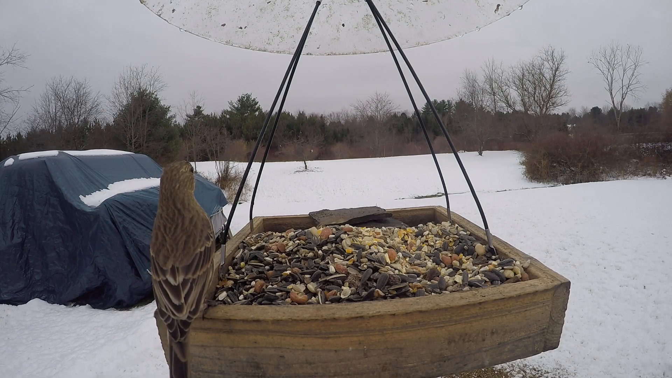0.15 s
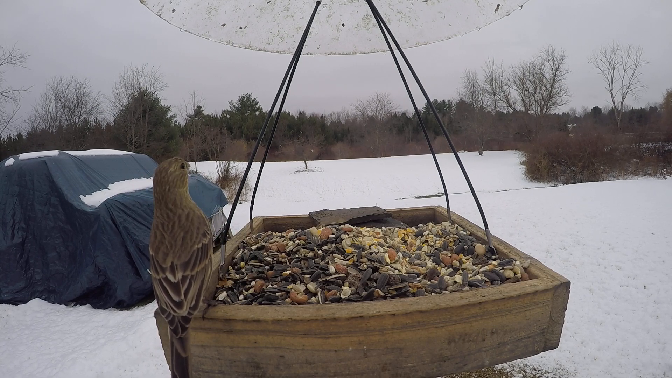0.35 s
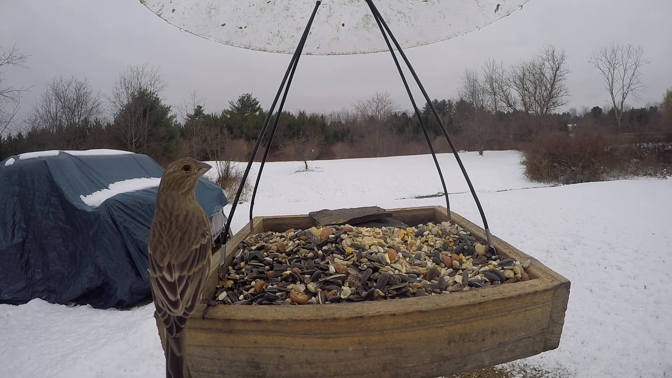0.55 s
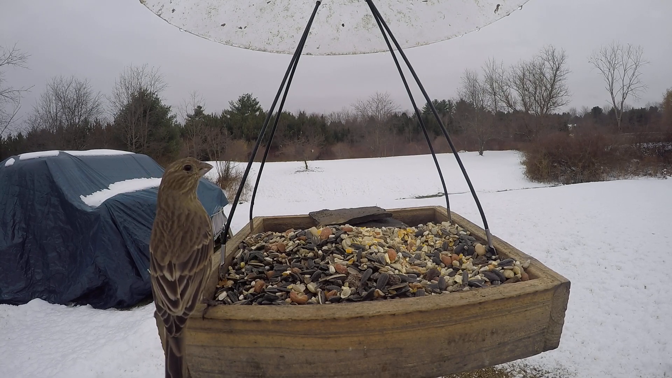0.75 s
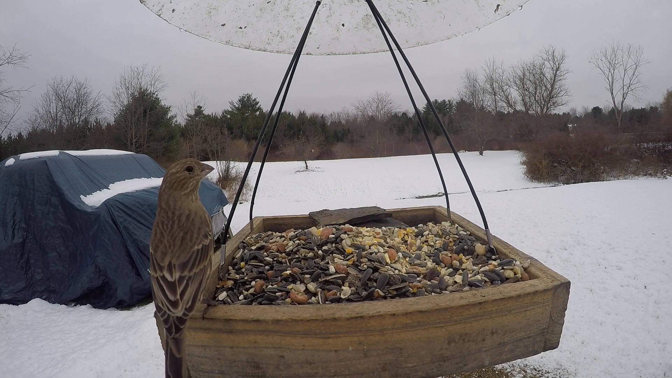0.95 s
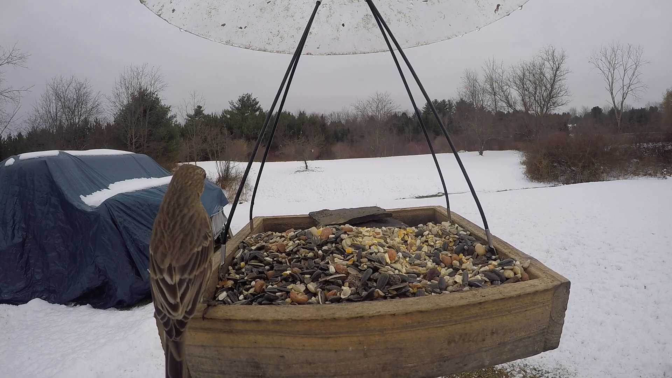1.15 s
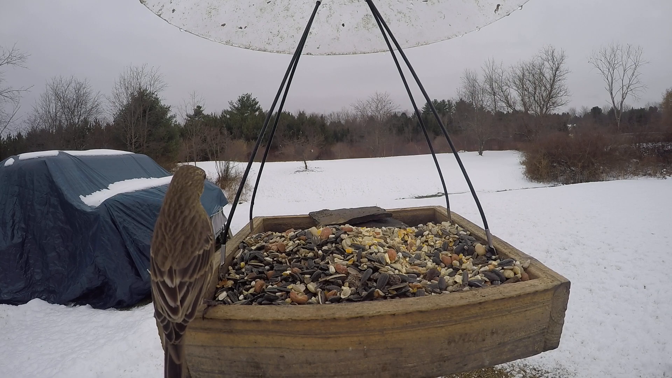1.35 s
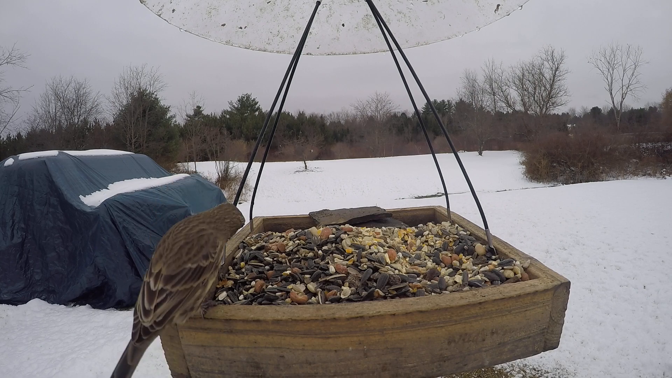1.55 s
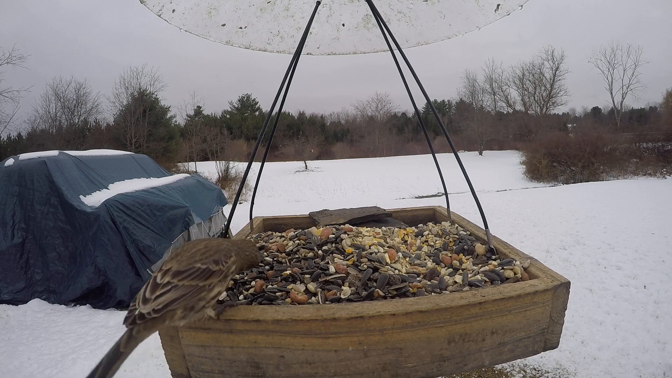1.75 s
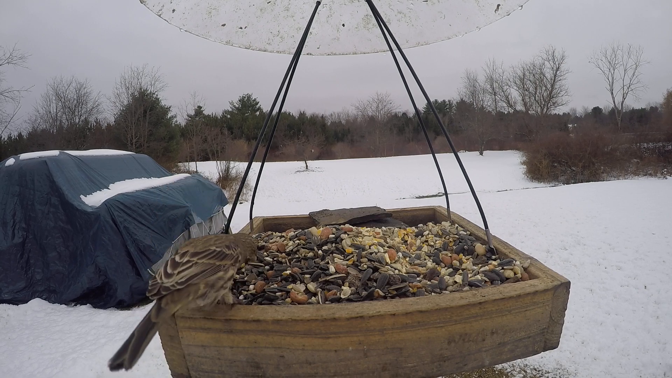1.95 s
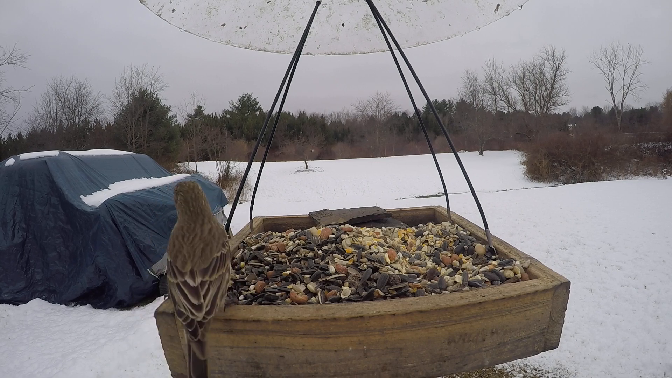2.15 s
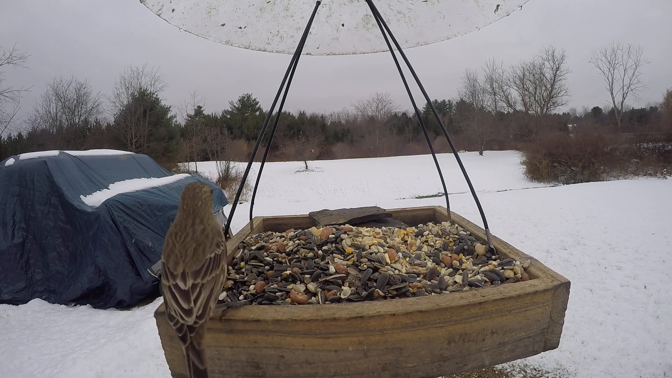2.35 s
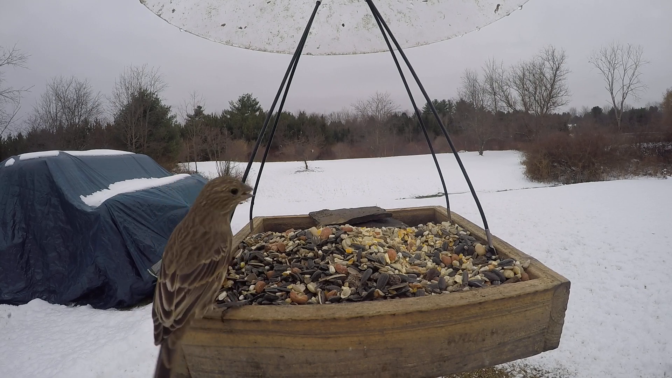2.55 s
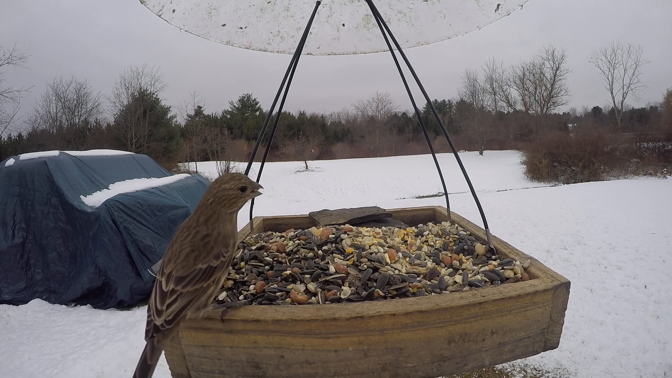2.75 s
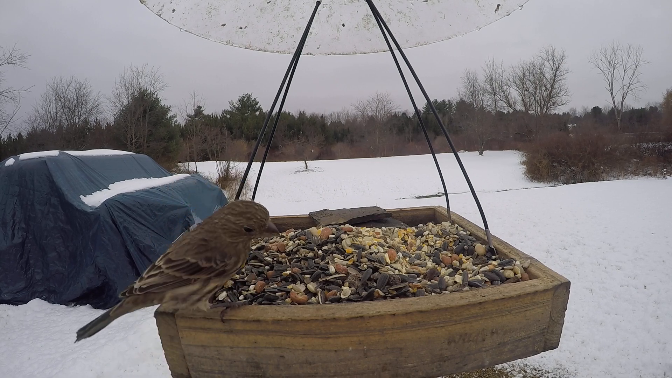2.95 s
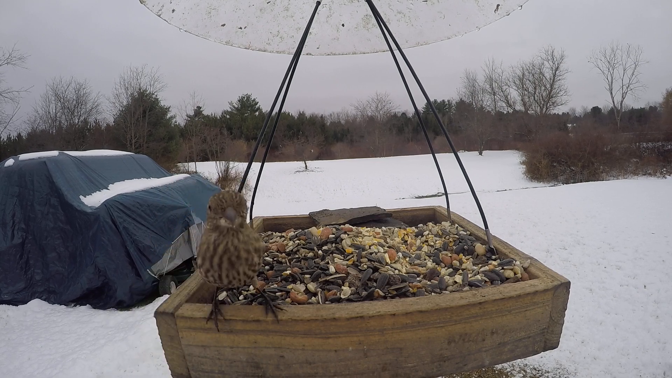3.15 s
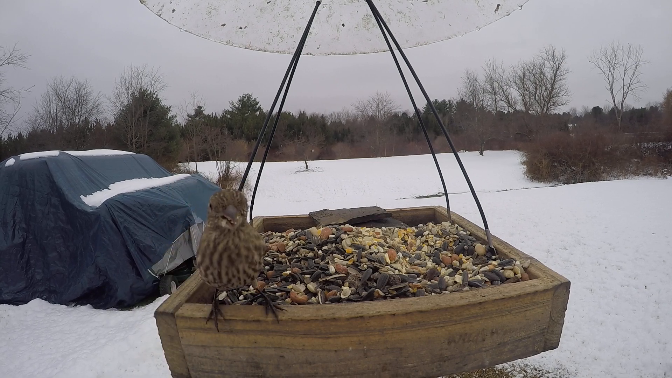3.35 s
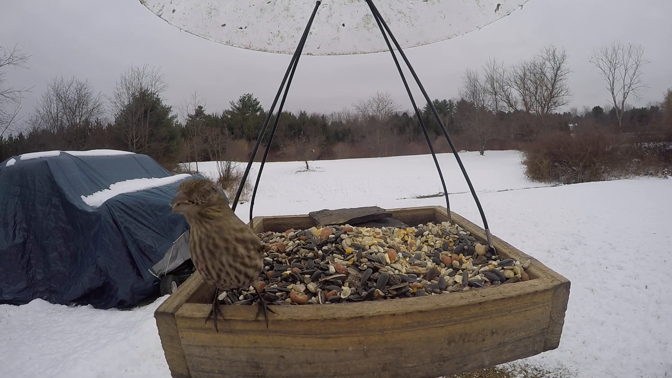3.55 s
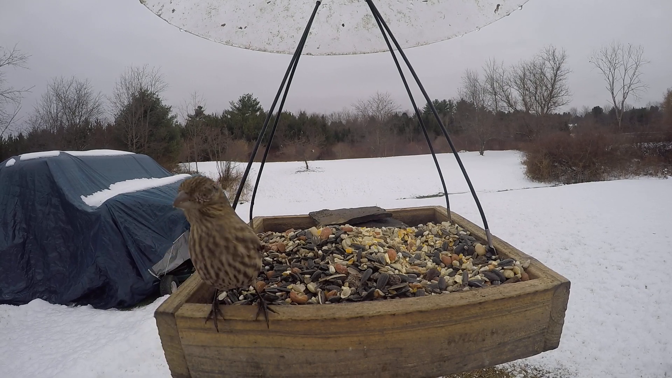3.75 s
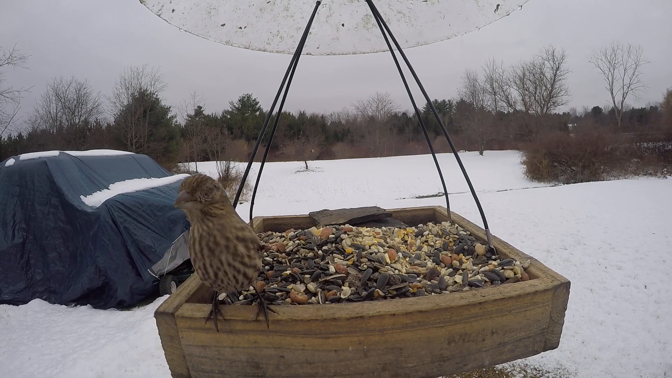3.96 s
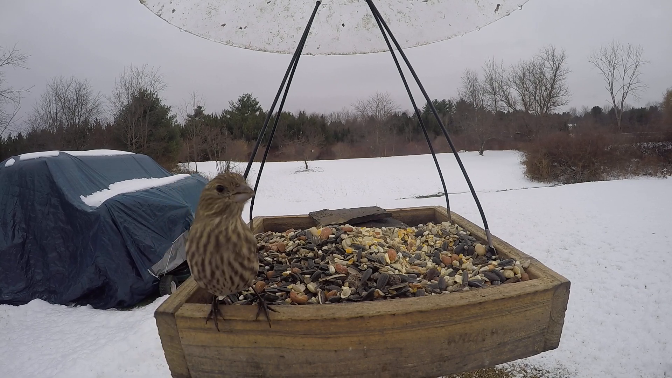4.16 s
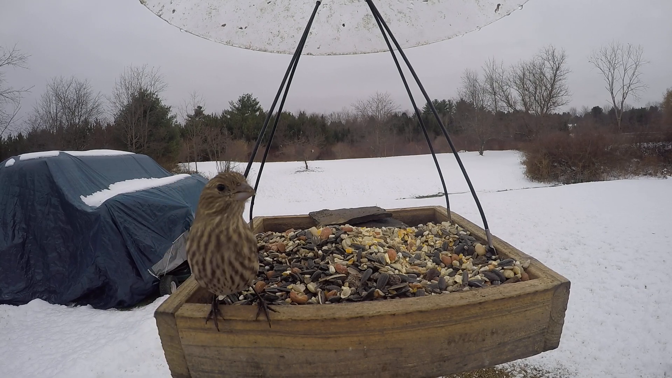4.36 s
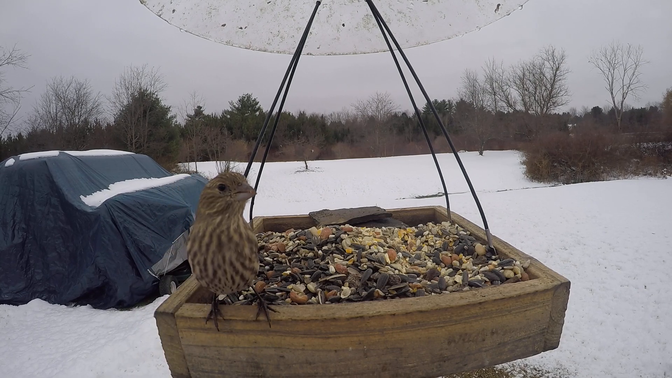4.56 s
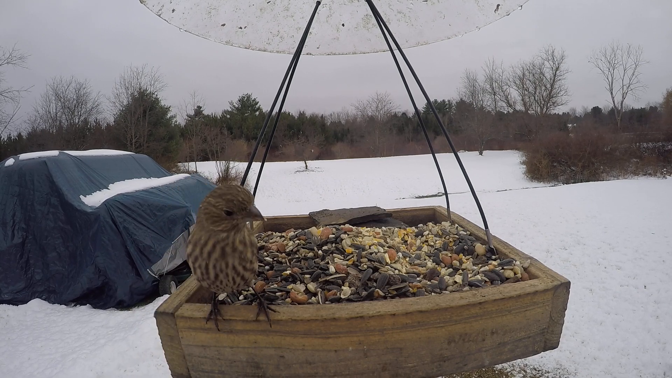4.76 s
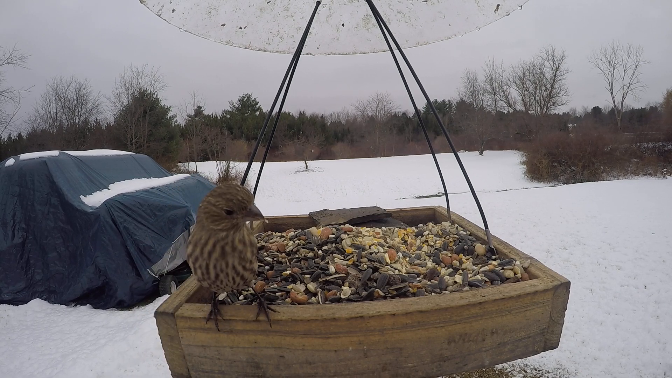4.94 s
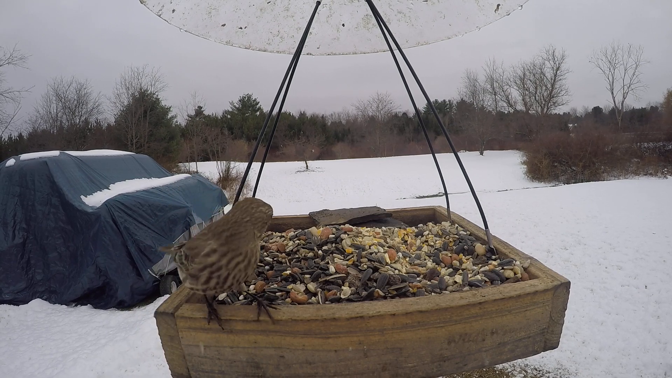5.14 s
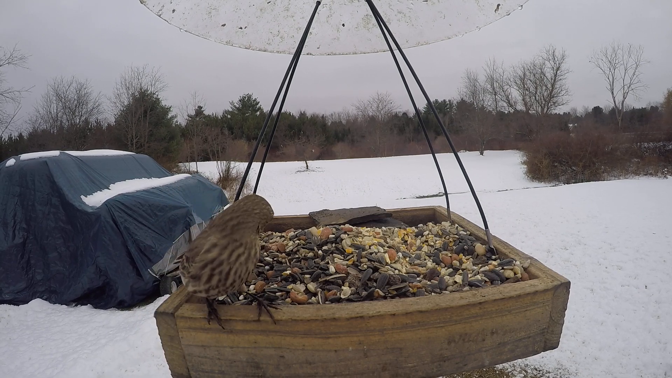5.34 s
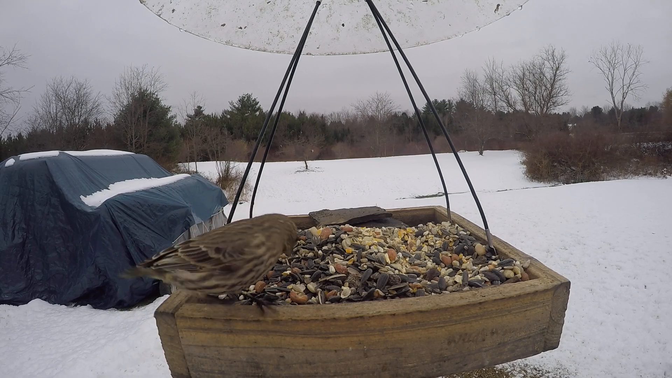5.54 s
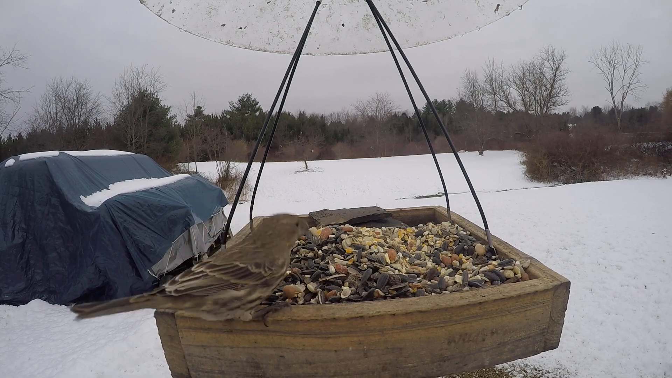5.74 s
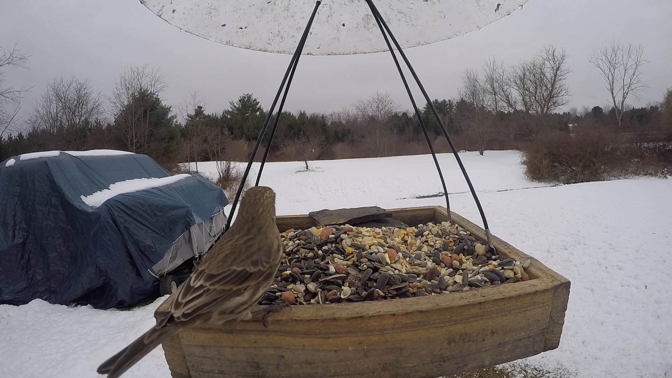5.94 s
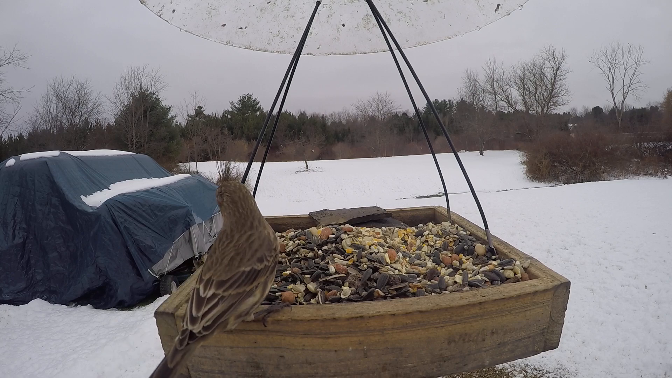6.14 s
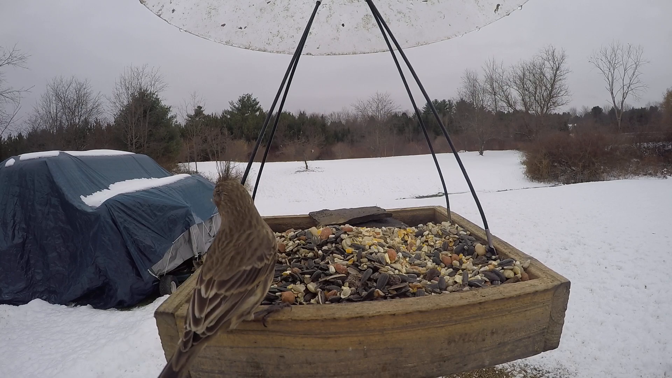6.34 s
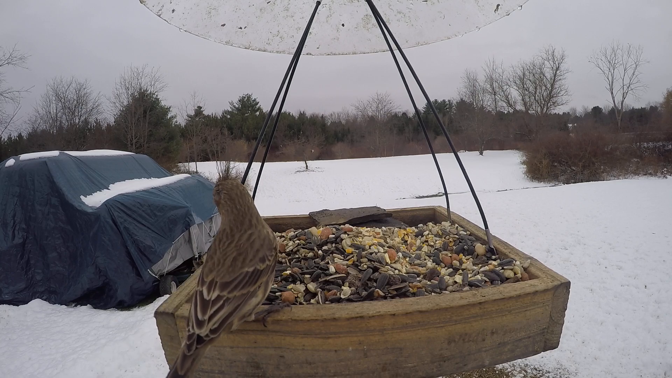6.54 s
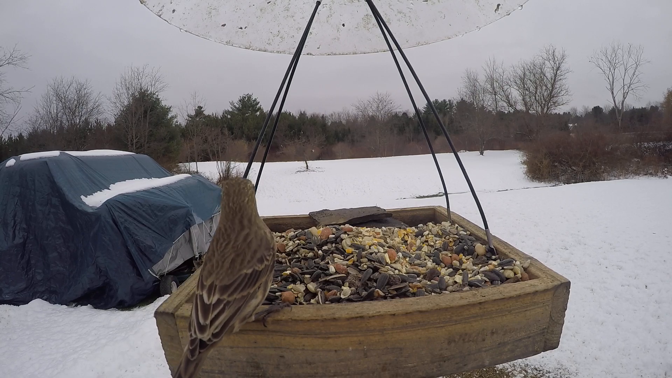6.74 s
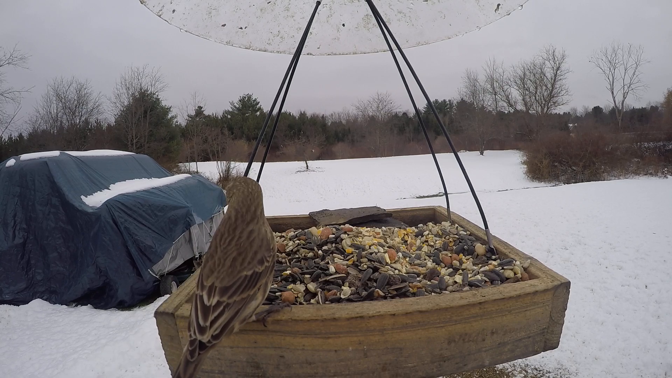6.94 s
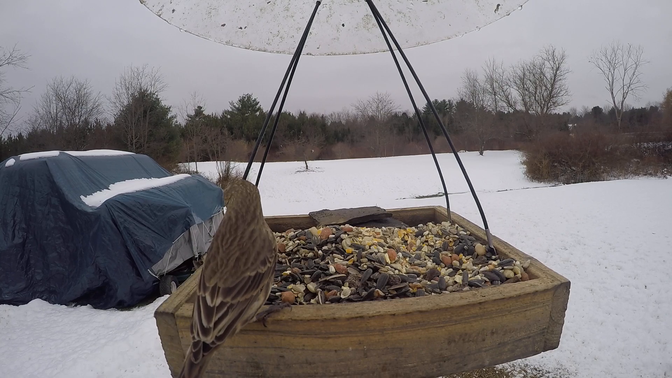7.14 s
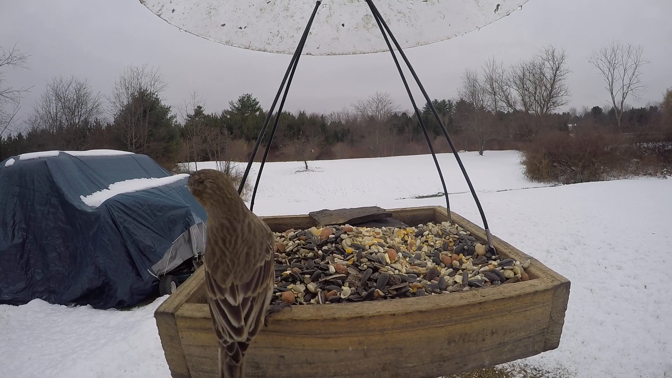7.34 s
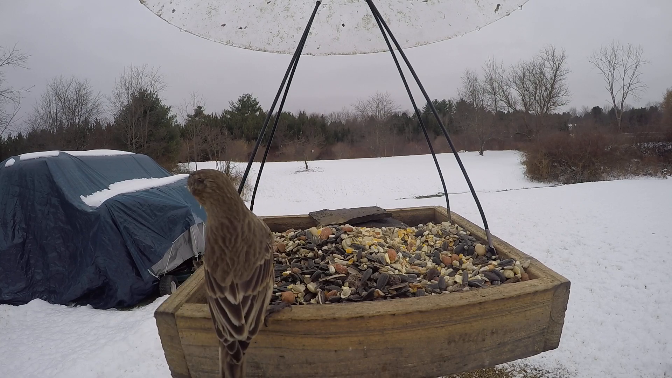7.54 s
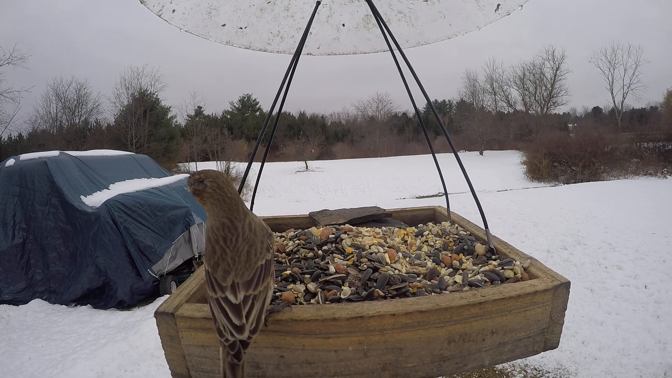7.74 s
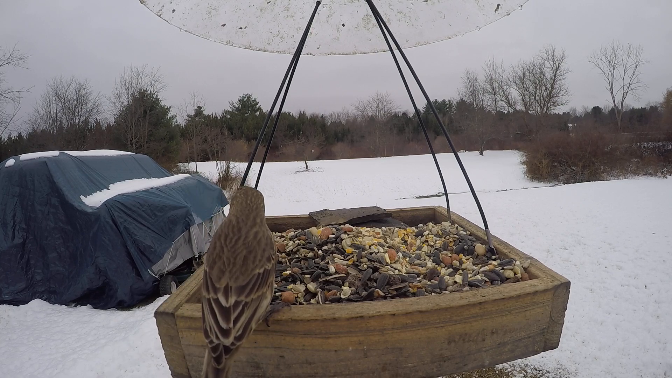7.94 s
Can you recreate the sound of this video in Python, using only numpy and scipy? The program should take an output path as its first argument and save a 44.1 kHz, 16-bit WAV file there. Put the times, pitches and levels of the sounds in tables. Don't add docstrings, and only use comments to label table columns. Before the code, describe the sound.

A small bird shuffles on a hanging wooden seed tray, heard very close through the wood. Quiet at first with faint ticks and a far thin chip, then a busy flurry of hollow knocks and claw scratches around two seconds, another around three, a sharp burst near five and a half, and a few isolated taps later. Deep wobbling rumble follows each jolt, over faint steady hiss in an open snowy field.

```python
import sys
import numpy as np
from scipy import signal
from scipy.fft import rfft, irfft, next_fast_len
from scipy.io import wavfile
from scipy.ndimage import uniform_filter1d

SR = 44100
rng = np.random.default_rng(int(sys.argv[2]) if len(sys.argv) > 2 else 0)


def dump_mix(stems):
    frames = np.atleast_2d(stems).T
    limited = np.clip(frames, -1, 1)
    pcm = np.round(limited * 32767).astype(np.int16)
    wavfile.write(sys.argv[1], SR, pcm)


def to_linear_factor(level_db):
    exponent = np.asarray(level_db, float) / 20
    return 10 ** exponent


N = 357033

# frequency in Hz, level in dB per Hz.
HISS_SPECTRUM = [(26, -26.5), (45, -6), (60, -14.5), (81, -16.5), (128, -24), (453, -34), (792, -34.5),
                 (1490, -39.5), (4900, -39.5), (6250, -44), (9300, -47), (10200, -47), (12000, -49),
                 (13200, -46.5), (15000, -51.5)]
# start in seconds, length in seconds, first pitch in Hz, last pitch in Hz, level in dB.
FAR_CHIPS = [
    (0.76, 0.1, 8500, 7400, -71),
    (0.76, .07, 9700, 9000, -84),
    (1.055, 0.074, 7700, 7500, -74),
]
# start in seconds, peak in dB.
HUSK_SNAPS = [
    (2.398, -42),
    (5.6417, -40),
    (6.4346, -44),
]
# time in seconds, swing just after in dB.
JOLTS = [(0, -45), (.37, -41), (.63, -40.5), (1.09, -37), (1.55, -40), (1.74, -46), (1.85, -38),
         (1.97, -24), (2.14, -25.5), (2.47, -36), (2.6, -45.5), (2.74, -42), (2.95, -41), (3.21, -24.5),
         (4.8, -44), (5.18, -42), (5.3, -47), (5.42, -40.5), (5.62, -42), (5.68, -26), (5.95, -30.5),
         (6.77, -69), (6.87, -40), (7.0, -35.5), (7.38, -34), (7.88, -53.5), (7.99, -40.5)]
# start in seconds, pitch in Hz, level in dB, time to fade by 60 dB in seconds.
WIRE_RINGS = [
    (3.255, 134, -53.5, 0.9),
    (5, 340, -49, 0.031),
    (1.188, 1070, -43.5, .012),
    (6.7335, 604, -37, 0.032),
    (3.2, 560, -37.5, 0.046),
    (1.8, 370, -55, .04),
    (2.3, 350, -50.5, 0.05),
]
# time in seconds, long board peak in dB, short board level in dB.
LANDINGS = [(0.348, -46.5, -68), (1.471, -54, -71), (1.555, -44.5, -69), (1.801, -33, -36),
            (1.939, -30, -40.5), (1.991, -40, -48.5), (2.164, -37.5, -36), (2.441, -41.5, -40.5),
            (2.651, -51.5, -56.5), (2.955, -45, -54), (2.996, -54, -55), (3.053, -36, -51),
            (3.13, -43, -53), (3.169, -34, -44), (3.2, -32, -39), (3.628, -47, -51.5), (4.08, -53, -67),
            (5.197, -64, -61), (5.621, -37, -55), (5.658, -41, -35), (5.763, -37.5, -45.5),
            (5.858, -44.5, -50.5), (6.74, -42, -55), (7.368, -40, -44.5), (7.854, -69, -80),
            (7.948, -56, -66)]
# pitch in Hz, level in dB, time to fade by 60 dB in seconds.
LONG_BOARD_MODES = [(47.5, -5.5, 0.27), (61, -2.5, 0.077), (78, -4.5, 0.28), (100.8, -8.5, 0.22)]
SHORT_BOARD_MODES = [(168.4, 2, 0.061), (186.7, 2, 0.12), (344, -11.5, 0.11)]
# pitch in Hz, level in dB, time to fade by 60 dB in seconds.
LOW_HOUSING = [(532, -27.5, 0.028), (585, -14, 0.028), (709, -9, 0.019), (762, -3.5, 0.018),
               (907.5, -1, 0.023), (970.5, -3.5, 0.028), (1124, -11.5, 0.01), (1310, -23, 0.03)]
MID_HOUSING = [(1400, -31, 0.00283), (1670, 2, 0.016), (1906, -16.5, 0.054), (2050, -12, 0.027),
               (2453, -5.5, 0.031), (2950, -4, 0.011)]
HIGH_HOUSING = [(3170, -6, 0.012), (3547, -1, 0.016), (3686, -1, 0.008), (4420, -10.5, 0.02),
                (5220, -3, 0.009), (5590, 4, 0.0053), (6440, -18.5, 0.0044), (8400, -29.5, 0.0032),
                (10400, -32.5, 0.0068)]
# start in seconds, pitch in Hz, peak in dB, time to fade by 60 dB in seconds.
SQUARE_RAPS = [(1.7975, 1050, -19, 0.006), (1.8065, 928, -24, 0.015), (1.9612, 897, -13.5, 0.019),
               (1.9645, 950, -26, 0.015), (1.9885, 980, -30, 0.013), (2.1672, 882, -17.5, 0.019),
               (2.165, 930, -25, 0.02), (2.4415, 966, -17, 0.0083), (2.4418, 650, -31.5, 0.037),
               (2.4465, 928, -34, 0.026), (5.6565, 930, -32, 0.011), (5.662, 810, -27.5, .025),
               (5.66, 550, -27.5, 0.019), (2.1645, 605, -29.5, 0.032), (3.028, 562, -38.5, 0.047),
               (5.624, 920, -36.5, 0.028), (5.643, 930, -33.5, 0.029), (2.445, 1400, -32.5, 0.014),
               (3.0275, 960, -33, 0.013), (3.2015, 1150, -22.5, 0.016), (3.6215, 980, -38.5, 0.03),
               (3.6278, 1100, -30, 0.014), (3.6315, 900, -29, 0.02), (5.6592, 1022, -15, 0.015),
               (6.7338, 930, -43.5, 0.016), (7.3772, 890, -22.5, 0.0077), (7.3825, 940, -27, 0.01),
               (7.3885, 940, -35, 0.014), (7.9562, 857, -35.5, 0.025), (7.9598, 1650, -42.5, 0.01),
               (7.9555, 2570, -51, .008)]
# start in seconds, pitch in Hz, peak in dB, time to fade by 60 dB in seconds.
TIP_CLINKS = [(1.786, 5660, -51, 0.011), (1.8305, 5540, -52, .01), (1.964, 5350, -40, .01),
              (2.007, 3460, -40, 0.011), (2.1385, 5520, -46.5, .014), (2.1553, 5450, -52, 0.011),
              (2.164, 5550, -40, 0.011), (2.4215, 5300, -54, .01), (2.657, 5500, -54, .01),
              (2.974, 5370, -49, 0.011), (3.001, 5600, -50, .012), (3.03, 4440, -44, 0.024),
              (3.2085, 5370, -39, 0.0091), (3.2085, 4430, -40, .012), (3.209, 3570, -49, 0.015),
              (3.628, 5400, -59, .01), (5.62, 5550, -40, .01), (5.642, 5430, -42, .01),
              (5.664, 5600, -51, 0.0092), (5.663, 3460, -36, 0.016), (5.752, 3500, -55, .01),
              (6.736, 2410, -58, .015), (7.363, 5700, -55, .012), (7.378, 5700, -62, .01),
              (7.9568, 5700, -55, 0.0095), (3.324, 4360, -69, .06), (2.443, 4460, -49, .012),
              (2.443, 5560, -58, 0.0091), (3.629, 2430, -58, .025), (5.729, 2440, -53, .02),
              (7.378, 4500, -52, 0.013), (1.187, 1710, -45, 0.0069), (1.187, 2600, -61, 0.0052),
              (5.661, 2900, -40, .01), (3.03, 7100, -43, 0.0067), (2.443, 3300, -47, 0.013),
              (5.671, 1920, -48, 0.044), (7.967, 1920, -63, 0.049)]
# time in seconds, strength in dB, knock share in dB, click share in dB.
HARD_BLOWS = [(1.713, -47, -16, -19.5), (1.8304, -38, -11, -31), (1.8883, -40.5, -13, -13),
              (1.9146, -32.5, -15, -21.5), (1.9605, -33, -12, -17), (1.986, -31.5, -10, -18),
              (1.997, -31, -23.5, -24), (2.0038, -35.5, -9, -23), (2.13, -35.5, -23, -30),
              (2.1384, -39, -11, -14.5), (2.1642, -26, -10.5, -19.5), (2.1967, -38.5, -16, -25),
              (3.028, -36, -11.5, -11.5), (3.1183, -45, -8, -11), (3.141, -40.5, -10, -16),
              (3.158, -44, -16, -16), (3.1827, -37.5, -12, -11.5), (3.1995, -23.5, -20.5, -25),
              (3.6279, -40.5, -8, -21), (5.2023, -43, -17, -31), (5.2317, -43.5, -9.5, -21),
              (5.6186, -49.5, 1.5, 3.5), (5.6608, -32, -2.5, -21), (5.88, -47.5, -11, -24.5),
              (7.3766, -38, -5.5, -16.5)]
# time in seconds, length in ms, strength in dB, knock share in dB.
CLAW_SKIDS = [(1.7482, 14, -55.5, -7), (1.819, 4.6, -46.5, -6), (1.879, 10, -54, -15),
              (1.952, 23.4, -34, -5), (1.968, 16.5, -33.5, -17), (2.1549, 11, -53, -8),
              (2.182, 13, -50, -8), (2.4187, 14, -51, -4), (2.656, 9.9, -48, -10.5),
              (2.9533, 14, -52.5, -4.5), (2.9717, 15, -49, -13), (2.998, 13.3, -55, 0),
              (3.0385, 16, -49.5, -7), (3.0515, 11, -54, -11), (3.208, 11.6, -42, -8.5),
              (5.1906, 14, -55, -5), (5.636, 13.5, -42, -14.5), (5.665, 4.4, -38, -2),
              (5.6764, 8.7, -47.5, -13), (5.6889, 13.8, -45, -11.5), (5.7284, 11.7, -47.5, -8),
              (5.7394, 14.4, -41, -15.5), (7.3557, 16, -50, -13), (7.387, 8.9, -53, -29),
              (2.4425, 5.5, -39, -4), (6.7335, 9.1, -55, -14.5), (7.956, 6.4, -47.5, -9),
              (1.7811, 13, -46.5, -3.5), (1.7985, 13.7, -31, -12.5)]
# time in seconds, strength in dB, knock share in dB.
TIP_TICKS = [(.38, -61.5, -9), (0.616, -62, 2.5), (1.1867, -60, 2.5), (1.3796, -63.5, -5),
             (1.4504, -60.5, 1), (1.4657, -65, 1.5), (1.506, -63, -12), (1.532, -52, -13), (1.76, -56, -23),
             (2.2493, -55, -3), (2.272, -56.5, -10), (2.3715, -60.5, -11), (2.3885, -67, -5),
             (2.986, -57, -14), (3.099, -60, -20), (3.2238, -54, -9), (3.596, -48, -14.5),
             (3.7591, -55, -13.5), (4.837, -52.5, -15.5), (5.149, -60.5, -11), (5.175, -47.5, -24),
             (5.212, -56, -26), (5.292, -51, -11.5), (5.382, -62, -9), (5.4065, -59, -9), (5.76, -56, -12),
             (5.8397, -54, -9), (5.857, -59, -8), (7.8696, -52, -12), (7.8803, -55, -15)]
# time in seconds, strength in dB.
PAD_TOUCHES = [(.3268, -55), (.6286, -56), (1.937, -53), (2.07, -52.5), (2.1156, -49), (2.2287, -51),
               (2.6092, -52), (2.6724, -50.5), (2.944, -50), (3.1723, -46), (3.564, -51), (3.5794, -56),
               (3.6465, -45), (3.6542, -51.5), (4.1101, -47.5), (4.1228, -53), (4.1397, -48.5), (4.81, -51),
               (5.1627, -60), (5.2454, -50), (5.6016, -70), (5.7114, -49), (5.8266, -51), (5.921, -56),
               (6.022, -48.5), (6.201, -50.5), (7.2898, -55.5), (7.8614, -60), (7.9076, -51.5),
               (8.0724, -59.5)]
# time in seconds, strength in dB.
TOE_BRUSHES = [(.4049, -64), (.4518, -66), (1.4253, -69), (1.4922, -61.5), (1.5467, -62), (1.8563, -62),
               (2.0828, -59), (2.334, -69), (2.3623, -60.5), (2.635, -64), (3.0776, -79), (3.2351, -69),
               (3.6713, -66), (3.8595, -64.5), (4.1466, -81), (4.7985, -58), (4.85, -76), (4.778, -65),
               (4.93, -64.5), (5.09, -70), (5.47, -66), (5.5434, -62), (5.589, -60), (5.7676, -55),
               (5.9343, -66), (5.9686, -65), (6.065, -62.5), (6.1828, -64), (6.802, -62.5), (7.0778, -64.5)]

HISS_DB = -59.5
AIR_DB, AIR_FOLLOWS = -76, 0.72
SWAY_DB = -59
SWING_HZ, SWING_DECAY_DB_PER_S, SWING_BUILD_S = 27.25, 16.5, 0.14
SCUFF_REST_DB, SCUFF_DB = -86.5, -66.5
SCUFF_FOLLOWS, BUSY_S = 0.68, 0.14
RAP_RISE_MS, CLINK_RISE_MS = 0.62, 0.67
BLOW_MS, TICK_MS, TOUCH_MS, BRUSH_MS = 8.76, 10.4, 7.8, 12.3
TICK_SHORTER_MS_PER_DB = 0.5
PAD_KNOCK_DB, BRUSH_KNOCK_DB = -30, -19
SKID_CLICK_DB, TICK_CLICK_DB = -9.5, -17
CONTACT_SAMPLES = 3072
STRAY_HOLES = 0.13
STARVE_FROM_HZ, STARVE_DB, STARVE_DB_PER_KHZ = 12800, -25, 3.0


def rms_one(x):
    return x / np.sqrt(np.mean(x ** 2) + 1e-20)


def band(x, low_hz, high_hz, order):
    return signal.sosfilt(signal.butter(order, [low_hz, high_hz], "band", fs=SR, output="sos"), x)


def ring(clicks, hz, t60):
    radius = to_linear_factor(-60 / (t60 * SR))
    turn = 2 * np.pi * hz / SR
    return signal.lfilter([0, np.sin(turn)], [1, -2 * radius * np.cos(turn), radius ** 2], clicks + 1e-18)


def strike(times, sizes, modes, spread_db):
    at = (times * SR).astype(int)
    chance = rng.standard_normal((len(times), len(modes)))
    out = np.zeros(N)
    for k, (hz, level_db, t60) in enumerate(modes):
        clicks = np.zeros(N)
        np.add.at(clicks, at, sizes * to_linear_factor(level_db + spread_db * chance[:, k]))
        out += (-1) ** k * ring(clicks, hz, t60)
    return out


def hiss():
    size = next_fast_len(N)
    hz = np.clip(np.arange(size // 2 + 1) * SR / size, 1, 14500)
    row_hz, row_db = np.transpose(HISS_SPECTRUM)
    shape_db = np.interp(np.log(hz), np.log(row_hz), row_db)
    noise = irfft(rfft(rng.standard_normal(size)) * to_linear_factor(shape_db), size)[:N]
    return to_linear_factor(HISS_DB) * rms_one(noise)


def far_birds():
    out = np.zeros(N)
    blur = rms_one(band(rng.standard_normal(N), 15, 160, order=2))
    for s, length, start_hz, end_hz, level_db in FAR_CHIPS:
        u = np.linspace(0, 1, int(length * SR))
        hz = start_hz + (end_hz - start_hz) * u
        whistle = np.sin(np.pi * u) * np.sin(2 * np.pi * np.cumsum(hz) / SR)
        start = int(s * SR)
        out[start:start + len(u)] += to_linear_factor(level_db) * whistle
    return out * blur


def swing_db():
    s, db = np.transpose(JOLTS)
    t = np.arange(N) / SR
    last = np.clip(np.searchsorted(s, t) - 1, 0, None)
    gain = to_linear_factor(db[last] - SWING_DECAY_DB_PER_S * (t - s[last]))
    span = int(SWING_BUILD_S * SR / 2)
    return 20 * np.log10(uniform_filter1d(uniform_filter1d(gain, span), span))


def wind():
    level = to_linear_factor(AIR_DB + AIR_FOLLOWS * (swing_db() + 36.5))
    return level * rms_one(band(rng.standard_normal(N), 110, 470, order=1))


def husks():
    s, db = np.transpose(HUSK_SNAPS)
    clicks = np.zeros(N)
    clicks[np.round(s * SR).astype(int)] = to_linear_factor(db - 4.0)
    fade = signal.lfilter([1], [1, -np.exp(-1 / (0.0017 * SR))], clicks + 1e-18)
    return band(fade * rng.standard_normal(N), 3500, 9000, order=2)


def mount():
    turn = 2 * np.pi * SWING_HZ * np.arange(N) / SR
    swing = np.sqrt(2) * to_linear_factor(swing_db()) * (np.sin(turn) + to_linear_factor(-47) * np.sin(2 * turn))
    stirred = ring(rng.standard_normal(N + SR), SWING_HZ, 1.0)[SR:]
    return swing + to_linear_factor(SWAY_DB) * rms_one(stirred)


def wires():
    rings = np.zeros(N)
    for s, hz, db, t60 in WIRE_RINGS:
        rings += strike(np.array([s]), to_linear_factor(db), [(hz, 0, t60)], spread_db=0)
    return band(rings, 103, 1300, order=2)


def boards():
    s, long_db, short_db = np.transpose(LANDINGS)
    knock = strike(s - 0.004, to_linear_factor(long_db + 1.0), LONG_BOARD_MODES, spread_db=5.5)
    knock = knock + strike(s - 0.002, to_linear_factor(short_db + 8.0), SHORT_BOARD_MODES, spread_db=0.5)
    return signal.sosfilt(signal.butter(3, 230, fs=SR, output="sos"), knock)


def contacts():
    rows = [(s, BLOW_MS, db, db + knock, db + click) for s, db, knock, click in HARD_BLOWS]
    for s, ms, db, knock in CLAW_SKIDS:
        rows.append((s, ms, db, db + knock, db + knock + SKID_CLICK_DB))
    for s, db, knock in TIP_TICKS:
        ms = TICK_MS - TICK_SHORTER_MS_PER_DB * (knock + 12)
        rows.append((s, ms, db, db + knock, db + knock + TICK_CLICK_DB))
    for soft, ms, knock in [(PAD_TOUCHES, TOUCH_MS, PAD_KNOCK_DB), (TOE_BRUSHES, BRUSH_MS, BRUSH_KNOCK_DB)]:
        rows += [(s, ms, db, db + knock, db + knock + TICK_CLICK_DB) for s, db in soft]
    return np.transpose(rows)


def busy_db():
    s, length_ms, low_db, mid_db, high_db = contacts()
    marks = np.zeros(N)
    np.add.at(marks, (s * SR).astype(int), to_linear_factor(low_db + 36.0))
    span = int(BUSY_S * SR / 2)
    nearby = uniform_filter1d(uniform_filter1d(marks, span), span)
    return 20 * np.log10(span * np.abs(nearby) + 1e-6)


def scuff():
    level = to_linear_factor(SCUFF_REST_DB) + to_linear_factor(SCUFF_DB + SCUFF_FOLLOWS * busy_db())
    happens = rng.random(N) < 1500 / SR
    slips = happens * to_linear_factor(14 * rng.random(N)) * rng.choice([-1, 1], N)
    low, mid = np.zeros(N), np.zeros(N)
    for k, (hz, db, t60) in enumerate(LOW_HOUSING):
        low += (-1) ** k * to_linear_factor(db) * ring(slips, hz, 0.69 * t60)
    for k, (hz, db, t60) in enumerate(MID_HOUSING):
        mid += (-1) ** k * to_linear_factor(db - 25.5) * ring(slips, hz, t60)
    return level * rms_one(band(low, 520, 896, order=2) + band(mid, 1400, 3300, order=2))


def tones(rows, rise_ms):
    s, hz, db, t60 = np.transpose(rows)[:, :, None]
    step = np.arange(CONTACT_SAMPLES)
    t = step / SR
    swell = 1 - np.exp(-(1000 * t / rise_ms) ** 2)
    shape = swell * to_linear_factor(db - 60 * t / t60)
    out = np.zeros(N + CONTACT_SAMPLES)
    np.add.at(out, (s * SR).astype(int) + step, 2 * shape * np.sin(2 * np.pi * hz * t))
    return out[:N]


def clinks():
    return tones(TIP_CLINKS, CLINK_RISE_MS)


def raps():
    return band(tones(SQUARE_RAPS, RAP_RISE_MS), 542, 4970, order=3)


def housing(slips, length, rms_db, modes, focus, edges_hz, spread_db, crack_db):
    chance = rng.standard_normal((len(slips), len(modes)))
    rung = to_linear_factor(crack_db) * slips
    for k, (hz, db, t60) in enumerate(modes):
        strength = to_linear_factor(focus * db + spread_db * chance[:, k:k + 1])
        rung = rung + (-1) ** k * strength * ring(slips, hz, t60)
    rung = band(rung, *edges_hz, order=3)
    return rung * to_linear_factor(rms_db) * np.sqrt(length / np.sum(rung ** 2, axis=1, keepdims=True))


def claws():
    s, length_ms, low_db, mid_db, high_db = contacts()[:, :, None]
    length = np.clip(length_ms, 2, 24) * SR / 1000
    step = np.arange(CONTACT_SAMPLES)
    draw = rng.random((len(s), 3, CONTACT_SAMPLES))
    slips = (draw[:, 0] < 0.2) * (draw[:, 1] - 0.5) * to_linear_factor(8.3 * draw[:, 2])
    padded = np.clip((low_db - mid_db - 22) / 6, 0, 1)
    blow_db = -15 * padded + 0.46 * (low_db + 29.5) - 2.26 * (length_ms - 13.0)
    blow = (step == 48) * 7.8 * to_linear_factor(blow_db)
    press_time = np.minimum(step / np.maximum(1.5 * length - 0.0048 * SR, 40), 1)
    press = slips * np.sin(np.pi * press_time ** (0.35 + 0.31 * padded))
    scratch = slips * np.sin(np.pi * np.minimum(step / (1.2 * length), 1) ** 0.44)
    hardness_db = np.minimum(0.25 * (low_db + 29.0) - 5.4 * (length_ms - 7), 0.1)
    focus = np.clip(0.46 - 0.1 * (mid_db - low_db + 4), 0.6, 2)
    rows = housing(press + blow, length, low_db + 0.23, LOW_HOUSING, focus, (470, 1600),
                   spread_db=3.0, crack_db=14.5 + hardness_db)
    rows = rows + housing(scratch + 0.12 * blow, length, mid_db + 0.154, MID_HOUSING, 0.7, (1250, 3300),
                          spread_db=1.0, crack_db=13.5 + hardness_db)
    rows = rows + housing(scratch + 0.18 * blow, length, high_db + 0.35, HIGH_HOUSING, 0.64, (2700, 12000),
                          spread_db=3.3, crack_db=-9 + hardness_db)
    out = np.zeros(N + CONTACT_SAMPLES)
    np.add.at(out, ((s - 0.0013) * SR).astype(int) + step, rows)
    return out[:N]


def scene():
    background = hiss() + far_birds() + wind()
    tray = mount() + wires() + boards()
    feet = scuff() + clinks() + raps() + claws()
    return (background + husks() + tray + feet)[None]


def starved_top(dry):
    hz, s, cells = signal.stft(dry[0], SR, nperseg=1024, noverlap=768)
    frame, patch = np.arange(len(s)) // 4, np.arange(len(hz)) // 4
    power = np.sum(np.abs(cells) ** 2, axis=0)
    load_db = 10 * np.log10(uniform_filter1d(power, size=12) + 1e-12)
    draw = rng.standard_normal((len(hz), len(s)))
    khz = (hz[:, None] - STARVE_FROM_HZ) / 1000
    strain_db = load_db + 7.0 * draw[0, frame] + 2.3 * draw[1 + patch][:, frame] + STARVE_DB_PER_KHZ * khz
    stray_draw = rng.random(cells.shape)[np.arange(len(hz)) // 3][:, frame]
    stray = stray_draw < STRAY_HOLES * (khz - 0.3)
    edge_hz = 15300 + 60 * draw[-1, frame]
    dropped = (khz > 0) & ((strain_db > STARVE_DB) | stray)
    kept = (hz[:, None] < edge_hz) & ~dropped
    return signal.istft(cells * kept, SR, nperseg=1024, noverlap=768)[1][None, :N]


def roll_off(x):
    return signal.sosfilt(signal.butter(12, 15640, fs=SR, output="sos"), x)


def record(dry):
    fade = np.minimum((N - 1 - np.arange(N)) / (0.006 * SR), 1)
    mix = starved_top(dry * fade)
    return roll_off(mix)


dry = scene()
out = record(dry)
dump_mix(out)
```